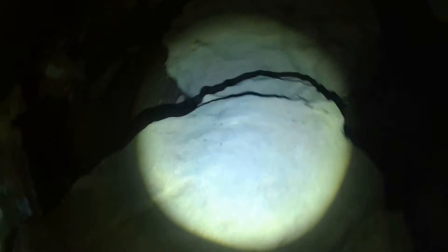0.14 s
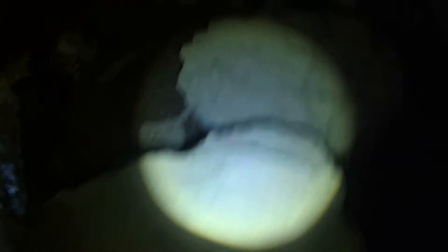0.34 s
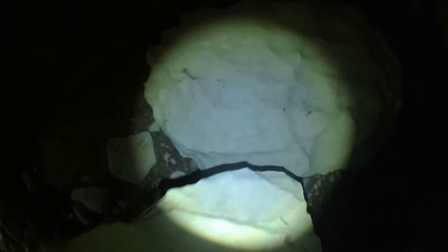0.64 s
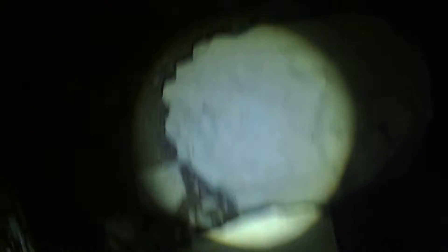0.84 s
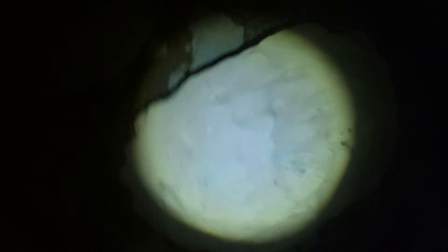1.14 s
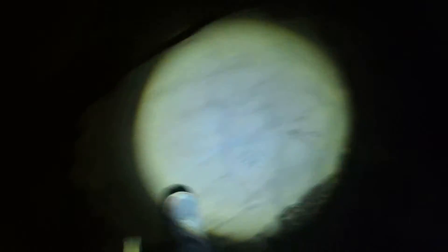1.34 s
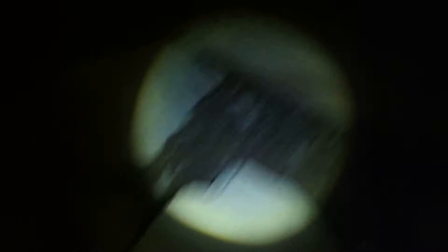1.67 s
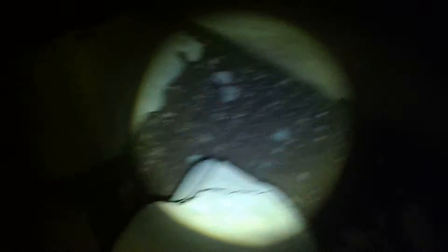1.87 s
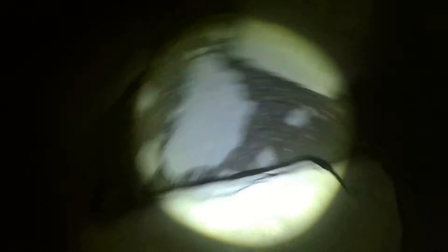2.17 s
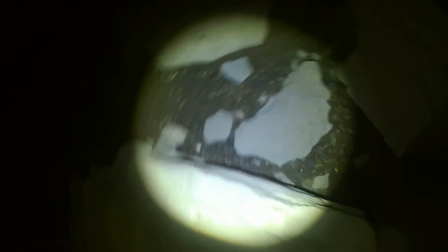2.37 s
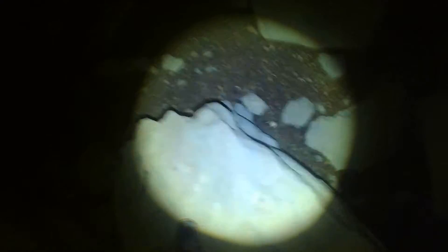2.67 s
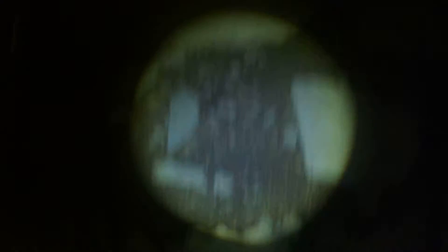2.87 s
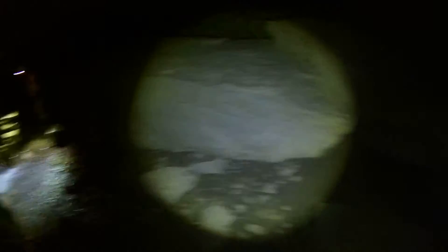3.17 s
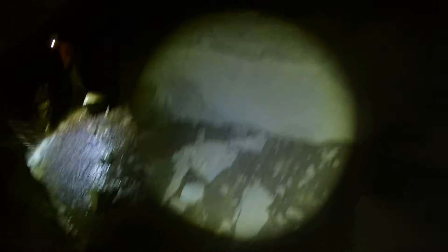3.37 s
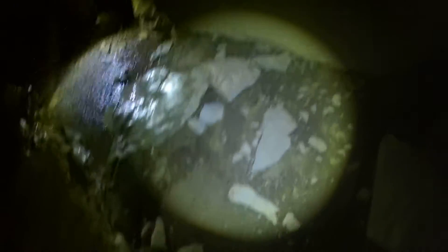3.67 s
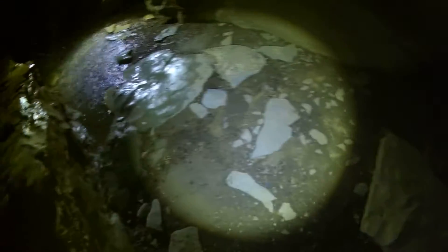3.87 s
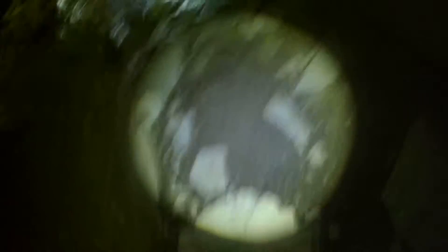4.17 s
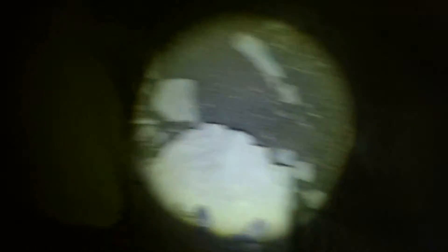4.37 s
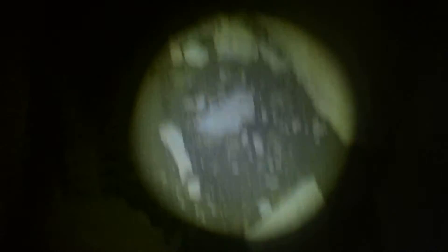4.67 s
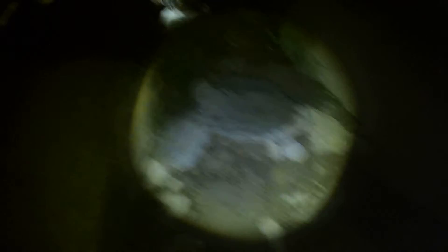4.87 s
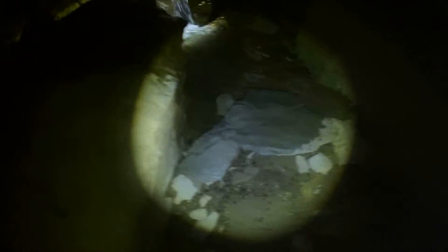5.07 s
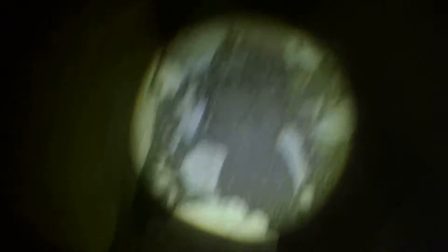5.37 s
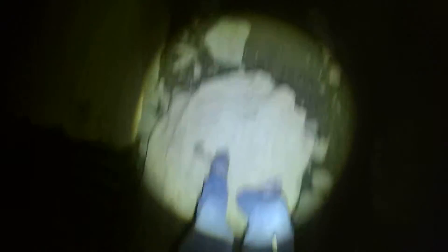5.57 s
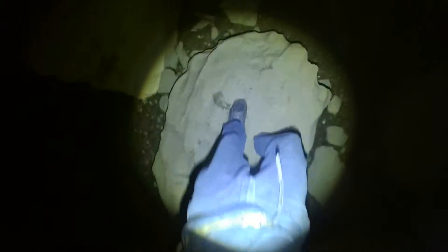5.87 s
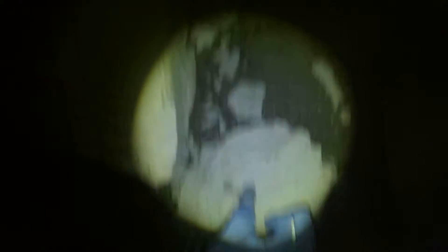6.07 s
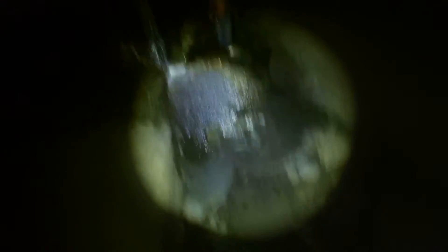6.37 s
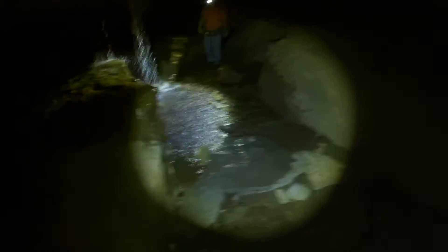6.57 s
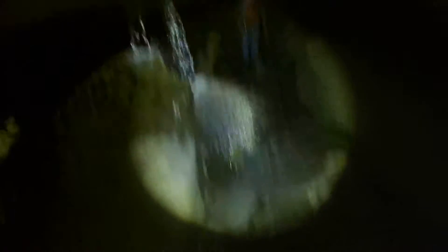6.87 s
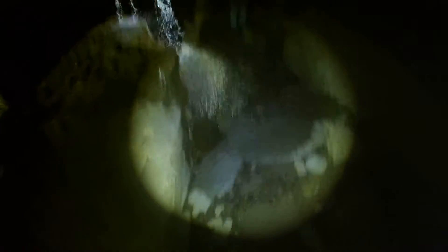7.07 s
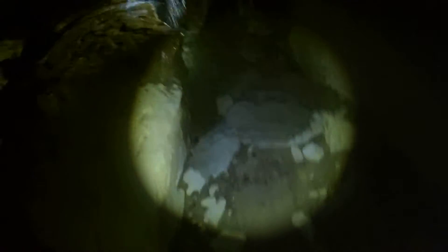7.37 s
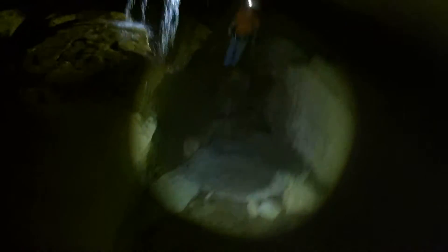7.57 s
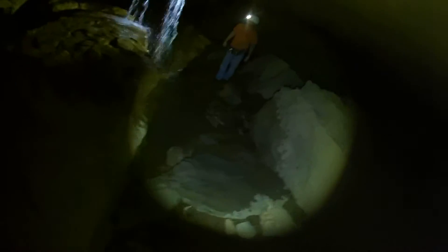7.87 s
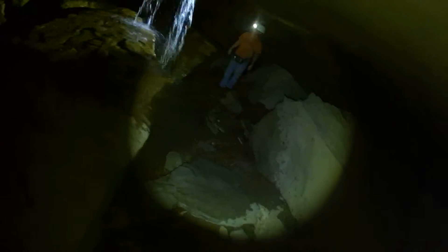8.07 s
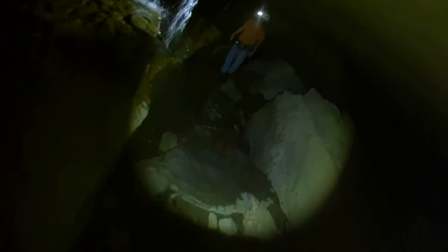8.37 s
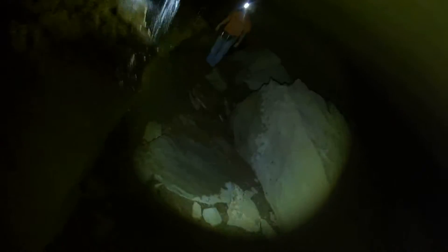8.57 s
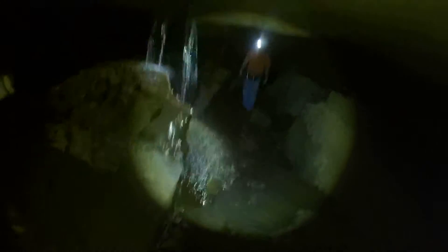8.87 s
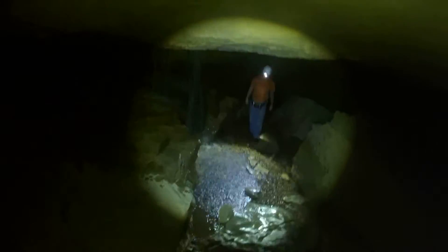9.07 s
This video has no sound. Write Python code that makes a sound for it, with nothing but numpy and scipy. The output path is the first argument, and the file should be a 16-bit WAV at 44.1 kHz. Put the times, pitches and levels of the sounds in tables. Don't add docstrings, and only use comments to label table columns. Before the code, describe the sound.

A mono, close and muffled cave scene heard from inside a sealed plastic camera case on a walker's head. A small waterfall runs throughout as a quiet, boxy rush, a little fainter near 1.8 s and fuller from 2.3 s onward, over faint hiss and a thin high whine. The first 1.5 s is mostly water and low swaying rumble. At 1.5 s a jolt and knock arrive; from 2.2 to 2.8 s come a deep boom, scuffing straps and hard plastic clacks. Thumps follow at 3.3 s, then a cluster with a heavy thud at 4.0-4.5 s. Lighter bumps and taps mark 5.1-6.3 s. A big jolt rattles the case at 6.5 s, with a knock at 7.2 s. Sharp clacks crowd 7.5-8.3 s, peaking in a distorted crack near 8.45 s. Rubbing, small taps and a last soft thud at 9.2 s close it.

```python
import sys
import numpy as np
from scipy import signal
from scipy.fft import rfft, irfft
from scipy.io import wavfile
from scipy.ndimage import uniform_filter1d

SR = 44100
rng = np.random.default_rng(int(sys.argv[2]) if len(sys.argv) > 2 else 0)


def gain_from_db(level_db):
    decades = np.asarray(level_db, float) / 20
    return 10 ** decades


def dump(signal):
    limited = np.clip(np.atleast_2d(signal).T, -1, 1)
    pcm = np.round(limited * 32767).astype(np.int16)
    wavfile.write(sys.argv[1], SR, pcm)


N = 407043
BIN_HZ = np.arange(N // 2 + 1) * SR / N

# time_s, level_db
WATER_LEVEL = [
    (0.0, -52),
    (0.5, -51),
    (0.9, -51.5),
    (1.77, -53.5),
    (2.29, -50),
    (4.2, -50),
    (5.22, -49),
    (6.84, -49.5),
    (8.64, -50),
    (9.23, -51),
]
# time_s, level_db
SWING_LEVEL = [(0.0, -41.5), (0.36, -46), (0.72, -43.5), (1.03, -47), (1.31, -40.5), (1.82, -39),
               (2.11, -48), (2.47, -32), (2.88, -51), (3.52, -42), (3.8, -49), (4.32, -33), (4.9, -51.5),
               (6.45, -39.5), (7.38, -45.5), (7.89, -34.5), (8.4, -49), (9.23, -47)]
# start_s, peak_db, ring_down_t60_s
JOLTS = [(0.301, -31, 0.26), (1.393, -41, 0.51), (1.543, -15, 0.32), (1.909, -26, 0.42), (2.263, -6, 0.14),
         (2.659, -17, 0.13), (2.827, -32, 0.23), (3.269, -20, 0.2), (3.456, -26, 0.24), (3.621, -26, 0.29),
         (3.877, -28, 0.39), (3.999, -12, 0.27), (4.065, -13, 0.57), (4.149, -21, 0.71), (4.305, -15, 0.38),
         (4.429, -15.5, 0.22), (5.109, -14, 0.16), (5.213, -10, 0.59), (5.629, -25, 0.14),
         (5.799, -36, 0.23), (6.01, -29.5, 0.54), (6.149, -38, 0.45), (6.296, -24.5, 0.43),
         (6.552, -5, 0.42), (7.048, -33, 0.63), (7.204, -12.5, 0.26), (7.289, -15, 0.23),
         (8.019, -21, 0.31), (8.295, -26.5, 1), (8.449, -18.5, 0.25)]
# start_s, shell_peak_db, body_peak_db, lid_peak_db, shell_tone_hz
KNOCKS = [(1.544, -20, -34, -50, 1680), (2.469, -18, -21.5, -39, 1460), (2.657, -6.5, -27, -44, 1576),
          (2.659, -9, -24, -28, 1950), (2.73, -15.5, -16, -35, 1300), (3.268, -21, -27.5, -49, 1870),
          (3.9951, -16.5, -18.5, -40, 1310), (4.4366, -20, -38, -32, 1300), (4.4508, -14.5, -18, -39, 1680),
          (6.482, -10, -29, -31, 1415), (6.5065, -9.5, -26, -31, 1490), (6.545, -9.5, -25, -35, 1540),
          (6.607, -12, -28, -33.5, 1390), (7.2337, -17, -27, -27, 1340), (7.5552, -7.5, -21.5, -37, 1370),
          (7.596, -26, -18, -47, 1390), (7.6247, -6, -30, -25, 1430), (7.6877, -12.5, -26, -49, 1380),
          (7.7178, -15, -23, -51, 1410), (7.942, -8, -19, -31, 1860), (8.1879, -4.5, -13, -40, 1370),
          (8.4563, -0.5, -10.5, -15, 1610), (8.464, -4, -22, -30, 1610)]
# start_s, shell_peak_db, shell_tone_hz
TAPS = [(1.567, -23, 1500), (1.6666, -26.5, 1300), (1.9066, -35, 1420), (1.947, -18.5, 1640),
        (2.3252, -23.5, 1170), (2.36, -25.5, 1980), (2.4218, -19, 1370), (2.6478, -16, 1330),
        (2.704, -18, 1310), (3.502, -19.5, 1350), (3.532, -24.5, 1900), (4.047, -23, 1910),
        (4.308, -21.5, 1340), (4.352, -22, 1340), (5.0988, -21.5, 1940), (5.2098, -32, 1400),
        (5.327, -20.5, 1450), (5.438, -24, 1380), (5.6079, -23, 1387), (6.1, -24, 1340), (6.142, -26, 1640),
        (6.81, -27, 1330), (7.197, -22.5, 1346), (7.77, -24, 1350), (7.802, -27.5, 1460),
        (8.247, -19.5, 1330), (8.2817, -27, 1900), (8.8123, -25, 1417), (8.842, -29, 1390),
        (9.0199, -23, 1464)]
# start_s, peak_db, pitch_hz
THUDS = [(1.5, -28, 175), (1.546, -17, 129.5), (1.661, -26, 156), (9.208, -23, 151), (2.262, -16, 154),
         (2.66, -15, 168), (3.261, -19, 154.3), (4.257, -19.5, 204), (4.447, -7, 262), (4.567, -22.5, 248),
         (5.102, -15.5, 136), (5.327, -17, 226.4), (5.356, -16, 160), (5.606, -22, 176), (6.099, -17, 244),
         (6.295, -21, 229), (6.378, -22, 245), (6.483, -15.5, 230), (6.615, -27, 220), (6.693, -23, 218),
         (6.806, -25.5, 253), (7.015, -24.5, 237), (7.196, -25, 170), (7.766, -16.5, 238),
         (7.876, -16, 149.4), (7.942, -12.5, 480), (8.027, -18.5, 160), (8.188, -22.5, 245),
         (8.455, -7.5, 300), (8.812, -19.5, 183)]
# start_s, end_s, shell_db, mount_db
SCUFFS = [(1.534, 1.623, -34.5, -30), (1.633, 1.719, -40.5, -35.5), (1.7, 1.925, -41.5, -46.5),
          (1.894, 1.998, -32, -48), (1.979, 2.108, -36.5, -36), (2.226, 2.288, -32, -35.5),
          (2.295, 2.51, -39, -34.5), (2.444, 2.632, -29, -29.5), (2.634, 2.7, -28.5, -25.5),
          (2.698, 2.756, -29.5, -35), (3.484, 3.57, -43, -40.5), (3.982, 4.025, -29, -34.5),
          (4.024, 4.11, -38.5, -42), (4.086, 4.246, -39, -38), (4.23, 4.377, -37.5, -30.5),
          (4.423, 4.466, -21, -28), (5.143, 5.25, -30.5, -32.5), (5.247, 5.353, -34.5, -41),
          (6.085, 6.244, -34.5, -35.5), (6.459, 6.539, -28.5, -21.5), (6.523, 6.647, -30, -24.5),
          (7.02, 7.085, -39, -34.5), (7.186, 7.281, -28.5, -30.5), (7.594, 7.647, -23, -30),
          (7.919, 7.98, -29.5, -25), (7.972, 8.103, -33.5, -39), (8.064, 8.18, -40.5, -42.5),
          (8.176, 8.263, -37.5, -31.5), (8.257, 8.368, -33, -26), (8.355, 8.476, -38.5, -35)]
# start_s, end_s, mount_db
TUGS = [(0, 0.24, -64), (0.296, 0.417, -50), (1.06, 1.307, -62), (2.078, 2.25, -47), (3.264, 3.317, -37),
        (4.493, 4.624, -39.5), (4.956, 5.087, -45), (5.083, 5.129, -35), (5.325, 5.413, -34),
        (5.407, 5.621, -42.5), (5.617, 6.13, -42.5), (6.251, 6.344, -30.5), (6.358, 6.424, -30),
        (6.617, 6.77, -38), (6.786, 6.85, -37), (6.845, 7.022, -43.5), (7.63, 7.922, -36.5),
        (8.44, 8.513, -27), (8.5, 8.688, -40.5), (8.65, 8.738, -37.5), (8.748, 9.007, -43.5),
        (9.015, 9.045, -38), (9.05, 9.197, -51), (1.874, 1.917, -40), (9.197, 9.248, -38)]
# start_s, depth_db
DUCKS = [
    (2.30, -4),
    (2.69, -3.5),
    (4.48, -4.5),
    (6.62, -3.5),
    (8.21, -1.5),
    (8.49, -1.5),
]
# start_s, end_s, depth_db
STALL = (2.2935, 2.309, -15)
# pitch_hz, width_hz, level_db
MOUNT = [(86, 22, -3), (131.6, 12.3, 5), (175, 34, 3), (244, 17.4, 6.5), (300, 50.6, -4), (494, 23.5, -5),
         (660, 33, -9)]
# pitch_hz, width_hz, level_db
SHELL = [(832, 12, -12.5), (1103, 204, -10), (1238, 220, -4.5), (1380, 76, 1.5), (1640, 120, -2),
         (1775, 154, -1), (1950, 128, -2), (2198, 125, -8), (2410, 326, -11), (2840, 260, -15.5)]
# pitch_hz, width_hz, level_db
LID = [(2707, 280, -2.5), (3700, 165, 2.5), (4140, 200, 2), (4554, 290, 2), (5130, 230, -4),
       (6120, 370, -14.5), (7630, 290, -15.5)]
# pitch_hz, width_hz, level_db
BODY = [(382, 280, 5.5), (664, 250, -3), (960, 210, -4)]
# pitch_hz, width_hz, level_db
SEAM = [(3040, 980, 0)]
# frequency_hz, level_db
LEAK = [(20, -23), (45, -3), (90, -27.5), (300, -33.5), (700, -29), (1500, -20.5), (3200, -40.5),
        (5500, -39.5), (9000, -55)]
# frequency_hz, density_db
HISS = [(5000, -27), (8500, -2.5), (12500, -0.5), (14500, -17), (15700, -10.5)]
# pitch_hz, rms_db
WHINE = [(12963, -94), (13045, -92), (13127, -89), (13209, -80), (13291, -81), (13373, -92), (13455, -94),
         (14373, -94)]


def curve(table):
    s, *columns = np.transpose(table)
    return [np.interp(np.arange(N) / SR, s, column) for column in columns]


def unit(x):
    return x / np.sqrt(np.mean(x ** 2))


def ring(x, modes, scatter_db=0.):
    out = 0
    for k, (hz, width_hz, db) in enumerate(modes):
        b, a = signal.iirpeak(hz, hz / max(width_hz, 5), fs=SR)
        gain = (-1) ** k * gain_from_db(db + scatter_db * rng.standard_normal())
        out = out + gain * signal.lfilter(b, a, x)
    return out


def dull(x, hz):
    return signal.sosfilt(signal.butter(4, hz, fs=SR, output="sos"), x)


def colour(x, points):
    hz, db = np.transpose(points)
    gain_db = np.interp(np.log(BIN_HZ + 1), np.log(hz), db, left=-80)
    return irfft(rfft(x) * gain_from_db(gain_db), N)


def walk(rate_hz):
    hold = int(SR / rate_hz)
    steps = np.repeat(rng.standard_normal(N // hold + 1), hold)
    return 1.203 * uniform_filter1d(uniform_filter1d(steps, hold), hold)[:N]


def grains(rate_hz, spread_db):
    hit = rng.random(N) < rate_hz / SR
    sign = rng.standard_normal(N)
    size = np.minimum(rng.exponential(size=N), 7.)
    return unit(hit * sign * gain_from_db(spread_db * size))


def dips(spans, edge_s):
    t = np.arange(N) / SR
    db = sum(depth * ((t > start) & (t < end)) for start, end, depth in spans)
    return gain_from_db(uniform_filter1d(db, int(edge_s * SR)))


def waterfall(db):
    drops = grains(2500, spread_db=2.5) + 1.7 * rng.standard_normal(N)
    flicker = gain_from_db([.5 * walk(9), .6 * walk(14), .8 * walk(6)])
    shell = gain_from_db(9.0) * unit(ring(dull(drops, 4030), SHELL))
    lid = gain_from_db(0.86) * unit(ring(ring(drops, LID), [(4150, 11000, 0)]))
    leak = gain_from_db(40) * colour(rng.standard_normal(N), LEAK)
    seam_db = -9.5 + 1.9 * (db + 49.5)
    seam = gain_from_db(seam_db) * unit(ring(ring(drops, SEAM), SEAM))
    through_case = (flicker * [shell, lid, leak]).sum(axis=0)
    return gain_from_db(db) * (through_case + seam)


def circuit():
    hiss = gain_from_db(-73.5) * unit(colour(rng.standard_normal(N), HISS))
    clock_s = np.cumsum(1 + .00035 * walk(.6) - .0002) / SR
    whine = 0
    for hz, db in WHINE:
        whine = whine + gain_from_db(db) * np.sqrt(2) * np.sin(2 * np.pi * (hz * clock_s + rng.random()))
    return hiss + whine


def mount_swing():
    restless = gain_from_db(curve(SWING_LEVEL)[0])
    size = restless.copy()
    for s, jolt_db, t60_s in JOLTS:
        start = int(s * SR)
        t = np.arange(N - start)[:SR] / SR
        onset = 1 - np.exp(-t / 0.0038)
        size[start:][:SR] += 0.58 * gain_from_db(jolt_db) * onset * gain_from_db(-60 * t / t60_s)
    spring_hz = 60.5 * (1 + .05 * walk(8.))
    spring_hz = spring_hz * (1 + 0.04367 * walk(25))
    swing = np.sqrt(2) * np.sin(2 * np.pi * np.cumsum(spring_hz) / SR)
    sway = unit(ring(rng.standard_normal(N), [(26, 13.8, 6), (48, 16.3, 3.5), (71.0, 25.0, -8.5)]))
    return size * swing + gain_from_db(-1.5) * np.sqrt(size * restless) * sway


def slide(column):
    tug_shell_db = -12
    tugs = [(start, end, db + tug_shell_db, db) for start, end, db in TUGS]
    out = np.zeros(N + SR)
    for row in SCUFFS + tugs:
        a, b = int(row[0] * SR), int(row[1] * SR)
        swell = np.sin(np.pi * np.arange(b - a) / (b - a)) ** 0.6
        out[a:b] += gain_from_db(row[column]) * swell
    return out[:N]


def rubbing():
    grip = gain_from_db(1.0 * walk(80))
    drag = unit(ring(dull(grains(600, spread_db=1.5), 950) * grip, MOUNT))
    slips = grains(4000, spread_db=2.2) * grip
    scrape = unit(ring(dull(slips, 2480), SHELL))
    scrape = scrape + gain_from_db(-14.5) * unit(ring(dull(slips, 1100), BODY))
    scrape = scrape + gain_from_db(-22.5) * unit(ring(dull(slips, 4100), LID))
    mount_gain = gain_from_db(-58.5) + slide(column=3)
    return mount_gain * drag + slide(column=2) * scrape


def blow(contact_s, modes, peak_db, top_hz):
    t = np.arange(SR // 10) / SR
    contact_s = np.clip(contact_s, .0005, .03)
    push = rng.standard_normal(len(t)) * np.exp(-(t / contact_s) ** 2)
    push[0] = 10
    sound = ring(dull(push, top_hz), modes, scatter_db=2.5)
    return gain_from_db(peak_db) * sound / np.abs(sound).max()


def knocks():
    out = np.zeros(N + SR)
    hard = [(*row, 0.0074) for row in KNOCKS]
    body_db, lid_db = -13.5, -17
    light = [(s, db, db + body_db, db + lid_db, hz, 0.01) for s, db, hz in TAPS]
    for s, shell_db, body_db, lid_db, hz, contact_s in hard + light:
        tap = blow(contact_s, [(900, 600, -9), (hz, 120, 9)] + SHELL, shell_db, 2400)
        tap = tap + blow(contact_s, [(2500, 300, 3), (3400, 200, 0)] + LID[1:4], lid_db, 5200)
        tap = tap + blow(contact_s, BODY, body_db, 1200)
        out[int(s * SR):int(s * SR) + len(tap)] += tap
    for s, db, hz in THUDS:
        thud = blow(0.0071, [(hz, 60, 11)] + MOUNT[1:5], db, 424)
        out[int(s * SR):int(s * SR) + len(thud)] += thud
    return out[:N]


def scene():
    ducking = dips([(s, s + 0.14, db) for s, db in DUCKS], 1 / 30)
    steady = (waterfall(*curve(WATER_LEVEL)) + circuit()) * ducking
    contact = rubbing() + knocks()
    mix = mount_swing() + (steady + contact) * dips([STALL], 1 / 800)
    return mix[None]


def band_limit(x):
    return signal.sosfilt(signal.butter(12, 16480, fs=SR, output="sos"), x)


def record(dry):
    clipped = np.clip(dry, -.71, .71)
    top_cut = signal.ellip(10, .2, 60, 15750, fs=SR, output="sos")
    finished = signal.sosfilt(top_cut, clipped)
    return band_limit(finished)


dry = scene()
out = record(dry)
dump(out)
```